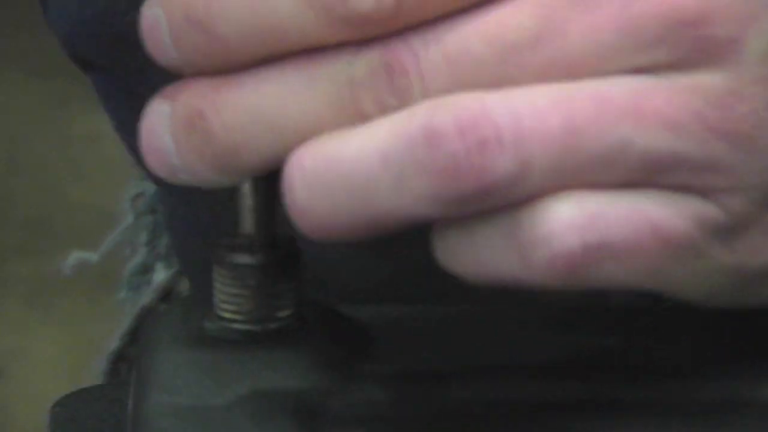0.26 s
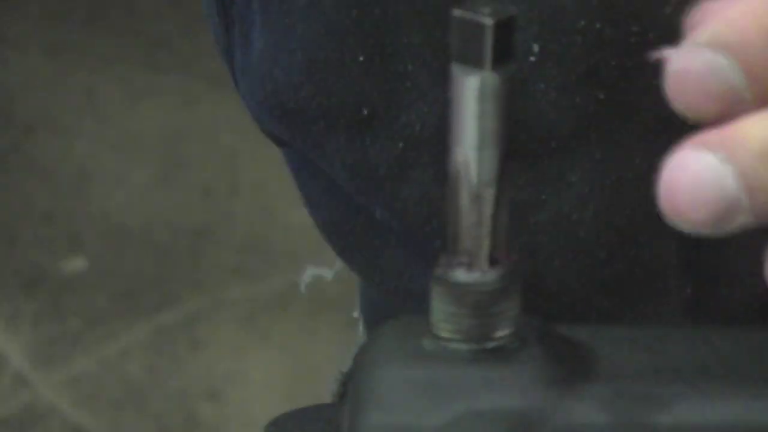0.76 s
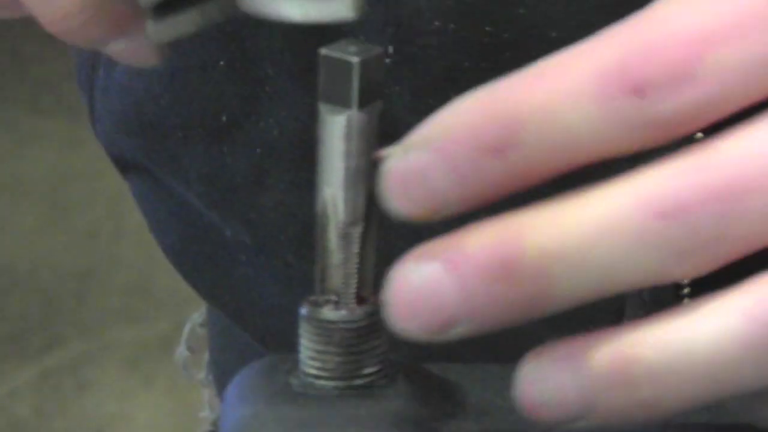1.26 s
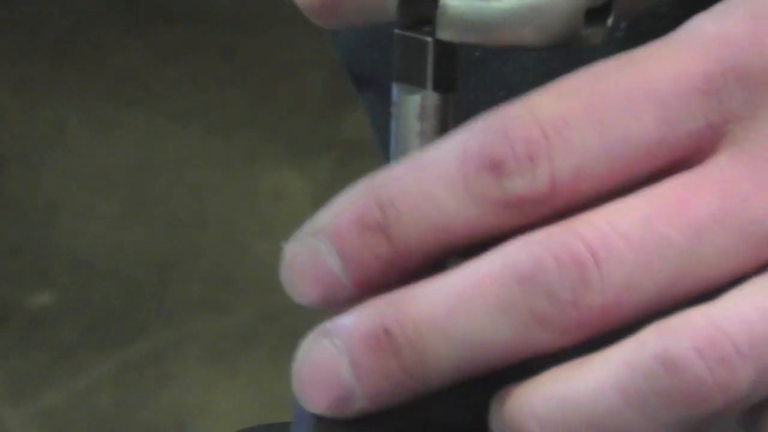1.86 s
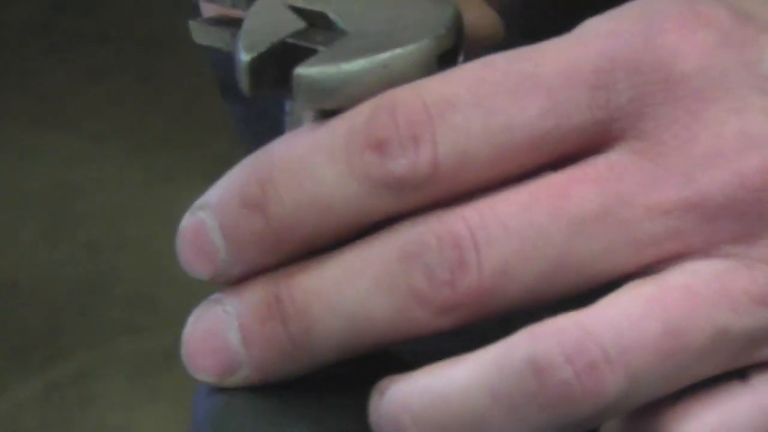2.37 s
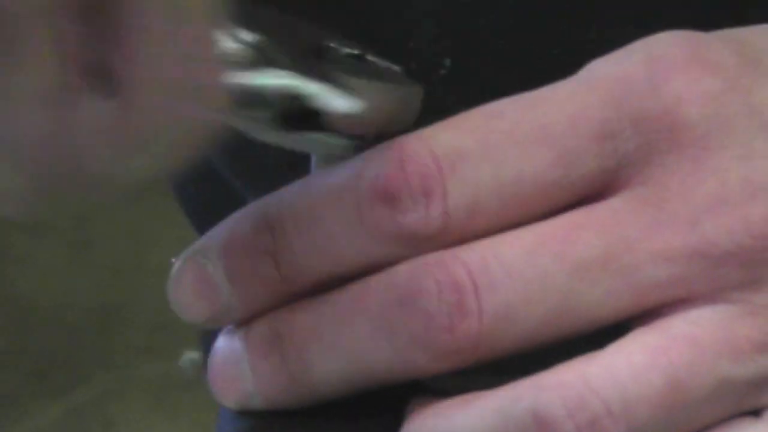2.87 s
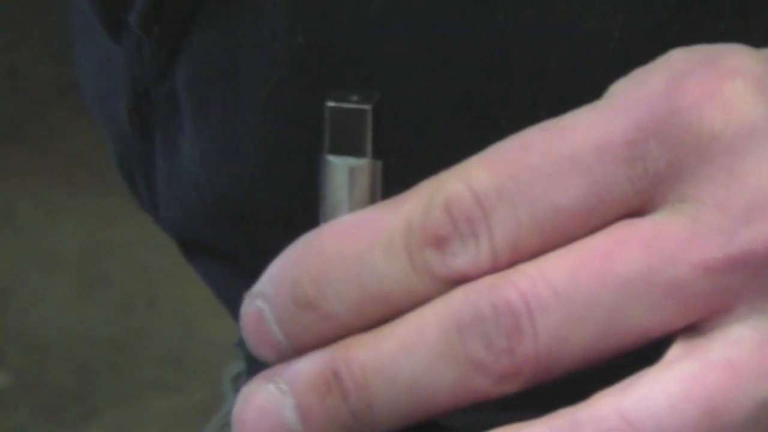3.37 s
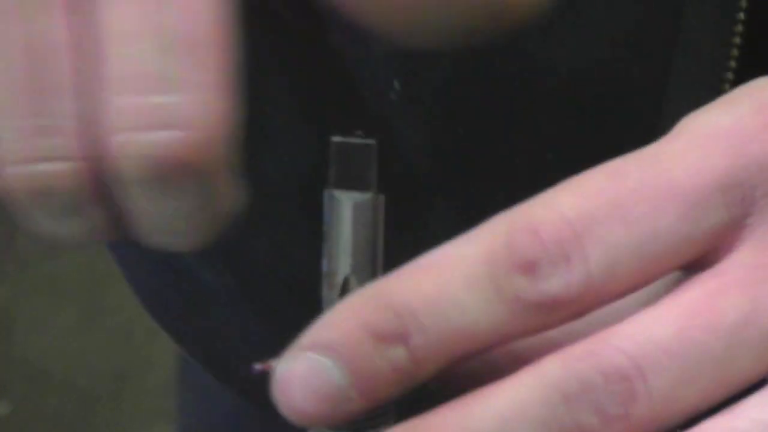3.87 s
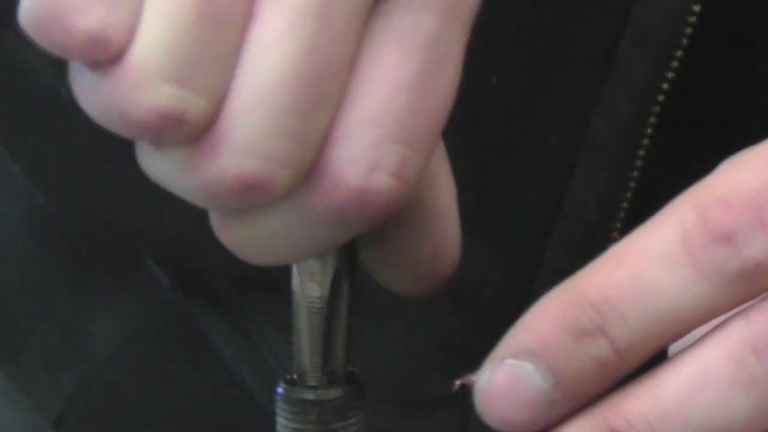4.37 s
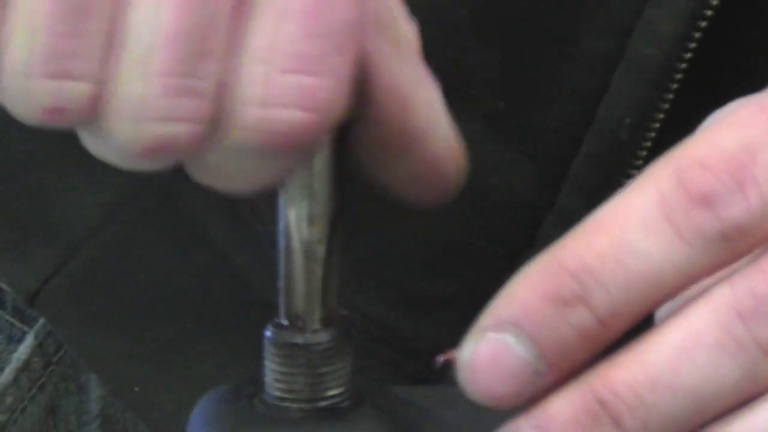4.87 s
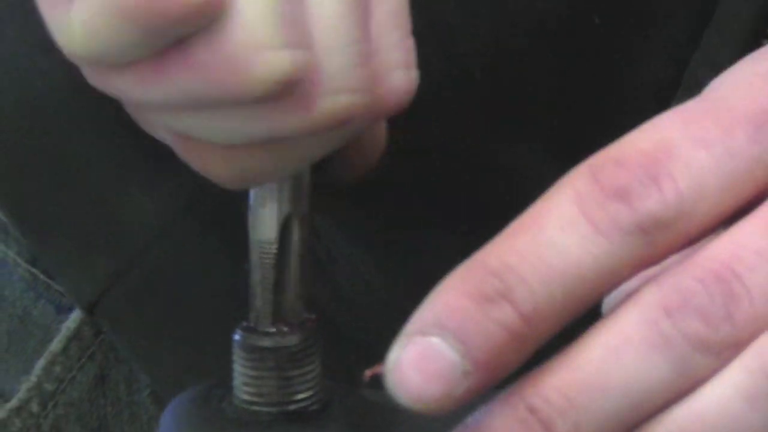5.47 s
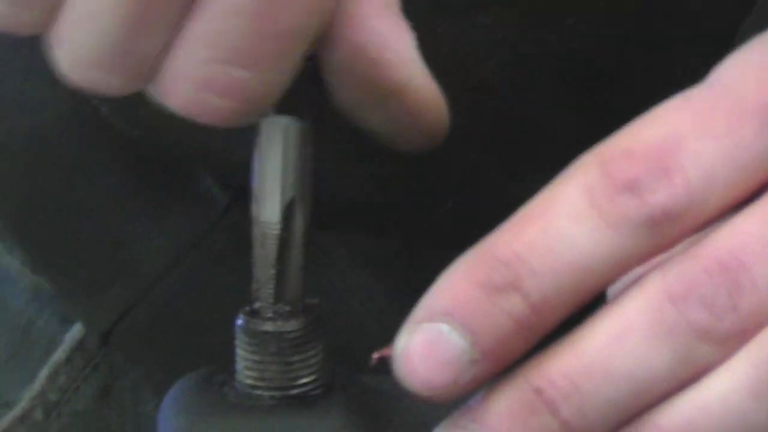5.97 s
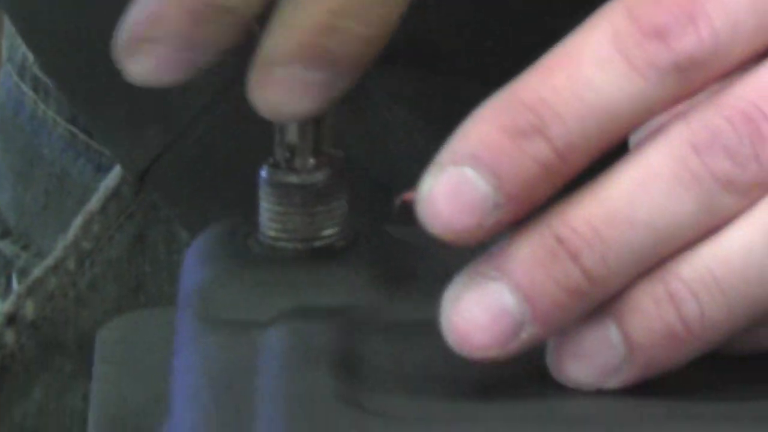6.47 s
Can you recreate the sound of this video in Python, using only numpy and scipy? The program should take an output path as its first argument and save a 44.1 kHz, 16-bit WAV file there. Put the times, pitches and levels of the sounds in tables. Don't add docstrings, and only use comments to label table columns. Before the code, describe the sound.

Steel wrench jaw knocks a tap in an empty sheet-metal tank, hollow thumps and bright clinks, then gritty thread scrapes, in a hard workshop.

```python
import sys
import numpy as np
from scipy import signal
from scipy.fft import rfft, irfft, next_fast_len
from scipy.io import wavfile
from scipy.ndimage import uniform_filter1d

SR = 44100
rng = np.random.default_rng(int(sys.argv[2]) if len(sys.argv) > 2 else 0)


def rack_gain(trim_db):
    fader = np.asarray(trim_db, float)
    return 10 ** (fader / 20)


def transcribe(signal):
    frames = np.atleast_2d(signal).T
    limited = np.clip(frames, -1, 1)
    pcm = np.round(limited * 32767).astype(np.int16)
    wavfile.write(sys.argv[1], SR, pcm)


N = 295911
ROOM_N, RING_N = SR * 3 // 5, SR * 2 // 5
FFT_N = 2 ** 15
FFT_HZ = np.fft.rfftfreq(FFT_N, 1 / SR)

# start in seconds, peak in dB, boom in dB, hardness in dB.
JAW_HITS = [(1.14, -62, -5, 12), (1.351, -18, -9.5, 1.5), (1.622, -9.5, -10, -10),
            (1.686, -17.5, -6.5, -2.5), (1.719, -17.5, -4.5, -18), (2.015, -16, -7.5, -5),
            (2.039, -13, -12, -13.5), (2.301, -28.5, -5.5, -11.5), (2.39, -12, -17.5, -8.5),
            (2.429, -14.5, -15, -48), (2.882, -27, -6, -15), (3.059, -25.5, -12, -13)]
# start in seconds, peak in dB, boom in dB, hardness in dB.
TAP_KNOCKS = [
    (4.277, -39.5, 9.5, -3),
    (4.309, -24.5, 1.5, -15),
    (4.446, -30, 0, -13),
    (5.457, -19, 0.5, -9.5),
    (5.474, -17, -1, -25.5),
    (5.634, -19, -8, -13),
    (5.965, -32, 4.5, -22.5),
    (6.254, -19.5, -13, -15.5),
    (6.369, -19, -10, -9),
    (6.411, -25.5, 0, -7.5),
]
# start in seconds, peak in dB, hardness in dB, contact length in seconds.
THREAD_BITES = [(2.372, -26, 4, .025), (2.541, -27.5, -13.5, 0.019), (3.312, -28, -12.5, 0.02),
                (4.327, -23.5, -23, 0.042), (4.364, -46, -29, 0.029), (5.569, -28.5, -6.5, 0.015),
                (5.614, -20, -13, 0.028), (6.043, -24, -10, 0.011), (6.066, -26, -6, 0.037),
                (6.127, -26, -11.5, 0.012), (6.209, -16.5, -10, 0.027), (6.347, -21, -8.5, 0.039),
                (6.431, -19, -29, 0.027), (6.652, -30, -24, 0.012)]
# start in seconds, peak in dB, boom in dB, hardness in dB.
TANK_BUMPS = [(0.523, -15, 0.5, -21.5), (0.53, -18.5, -4, -8.5), (0.54, -15, -3, -17),
              (2.272, -31.5, 0.5, -22), (2.391, -16.5, -5.5, -4), (2.688, -34, 6.5, -14),
              (2.76, -28, -7, -17.5), (3.562, -17.5, -3, -14), (3.654, -16, -1, -11),
              (3.669, -14.5, -1, -19), (3.697, -14.5, -1, -14.5)]
# start in seconds, peak in dB, hardness in dB.
FINGER_TAPS = [(0.291, -29.5, -18.5), (0.425, -34, -19.5), (4.287, -30, -18), (4.714, -42, -24),
               (4.736, -29, -21), (5.066, -29.5, -17), (5.209, -37, -37), (5.38, -27.5, -30),
               (5.421, -25.5, -23), (5.971, -35, -32)]
# middle in seconds, peak in dB, pitch in Hz, half
# length in seconds.
PANEL_SLAPS = [
    (0.5323, -9, 263, .0019),
    (.5382, -13.5, 268, .0019),
    (3.568, -12.5, 461, 0.0042),
    (3.6623, -7.5, 290, 0.0012),
    (3.668, -6.5, 290, 0.0011),
    (1.842, -25.5, 499, .017),
    (1.912, -27.5, 491, .016),
    (2.29, -28.5, 420, 0.023),
    (4.725, -36, 485, 0.0076),
]
# start in seconds, peak in dB, ring in dB, t60 in the grip in seconds,
# left minus right in dB.
WRENCH_CLINKS = [
    (1.1398, -16, -11.5, 0.13, 2.5),
    (3.0579, -8.5, -5.5, 0.047, 2.5),
    (3.149, -41, -13, .245, 2),
    (3.4925, -34.5, -7.5, 0.18, 6.5),
    (3.6561, -21, 5, 0.29, -2),
    (3.6681, -13.5, -3, 0.27, 6),
    (3.6965, -10, -4.5, 0.23, 3),
    (3.7294, -20.5, -15, .25, -3.5),
]
# peak time in seconds, peak in dB, swell in seconds, fade in seconds.
SCRAPE_STROKES = [
    (2.25, -32, 0.033, 0.18),
    (2.964, -34, 0.59, 0.062),
    (3.35, -47, 0.11, 0.19),
    (5.558, -36, .055, 0.088),
    (5.656, -33.5, 0.22, 0.032),
    (6.0, -51, 0.057, 0.19),
    (6.164, -30, 0.13, 0.059),
    (6.374, -33.5, 0.079, 0.23),
]
# peak time in seconds, peak in dB, swell in seconds, fade in seconds.
RUSTLE_STROKES = [
    (.538, -32.5, 0.049, 0.026),
    (.74, -40.5, 0.16, 0.046),
    (.782, -38, 0.038, 0.029),
    (2.46, -50, 0.23, 0.25),
    (2.98, -50, 2.2, .06),
    (3.058, -23, 0.03, .004),
    (5.11, -54, 0.034, 0.036),
    (6.222, -45, .11, 0.039),
    (6.336, -54, .06, .21),
]
# start in seconds, level in dB.
FLOOR_JOLTS = [
    (1.352, -47),
    (1.69, -45),
    (2.391, -31),
    (3.66, -41),
    (3.7, -42),
    (5.46, -55),
]

# low edge in Hz, high edge in Hz.
JAW_BANDS_HZ = [(130, 620), (900, 1850), (2400, 5000), (5000, 17000)]
KNOCK_BANDS_HZ = [(130, 700), (700, 1800), (1800, 5000), (5000, 17000)]
BUMP_BANDS_HZ = [(70, 250), (250, 700), (700, 1450), (1800, 7500)]
TAP_BANDS_HZ = [(70, 300), (300, 700), (700, 1400), (1850, 2600)]

# frequency in Hz, level in dB, t60 in seconds.
WALL_MODES = [(325, -9, .35), (414, -1, .7), (455, -5, .45), (490, -3, .7), (506, 0, .7), (585, -12, .2),
              (727, -4, .35), (851, -10, .2), (962, -9, .2), (1090, -8, .25), (1208, 0, .2), (1259, 2, .38),
              (1295, -6, .2), (1436, -9, .25), (1480, -5, .3), (1632, -1, .22), (2065, -10, .18),
              (2164, -10, .18), (2545, -10, .18), (2762, -10, .22), (2975, -10, .2), (3250, -8, .18),
              (4350, -11, .08), (4650, -13, .08), (5900, -12, .12)]
BELLY_MODES = [(83, -22, 0.69), (150.6, -10.5, 0.57), (171.5, -3, 0.16), (272.1, 2, 0.24),
               (288.6, 3.5, 0.14), (400, -10, 0.21)]
WRENCH_MODES = [(3640, -12, .06), (5600, -4, .1), (5650, -6, .32), (5916, -7, .1), (8043, -5, .27),
                (8100, -3, .06), (8850, -1.5, .08), (9033, -2, .06), (10230, -9, .05), (11650, -2, .04),
                (13000, -10, .04)]

# frequency in Hz, level in dB per Hz.
CRACK_SPECTRUM = [(35, -35), (60, -18), (156, -9), (338, -3.5), (503, -1.5), (1040, -8), (1250, -10.5),
                  (1660, -5.5), (1820, -16), (2050, -9.5), (2350, -15), (5210, -23), (9130, -27.5),
                  (16000, -44.5)]
RASP_SPECTRUM = [(71, -75), (120, -2.5), (205, 3.5), (373, -6), (513, 11), (567, -6.5), (706, 2.5),
                 (2070, -13), (14000, -48)]
CLOTH_SPECTRUM = [(1470, -9.5), (2500, -11), (2700, -10), (3130, -12.5), (10900, -19.5), (13700, -24),
                  (16000, -43.5)]
HUM_SPECTRUM = [(15, -28), (30, -14), (60, -6), (100, 4.5), (160, -5.5), (420, -1.5), (800, -9.5),
                (1600, -14.5), (2200, -19.5), (3200, -27), (5000, -28.5), (9000, -31), (14500, -31),
                (17000, -42)]

# frequency in Hz, t60 in seconds.
ROOM_T60 = [(80, 0.82), (250, 0.46), (1000, 0.63), (2500, 0.56), (5000, 0.41), (12000, 0.17)]
# frequency in Hz, likeness 0-1.
ROOM_ALIKE = [(100, 1), (1000, 0.61), (4000, 0.75), (10000, 0.11)]
HUM_ALIKE = [(60, 0.93), (180, 0.66), (550, 0.67), (1650, 0.51), (4970, 0.72), (15000, 0.23)]

# frequency in Hz, level in dB.
MIC_LOSS = [(40, -13), (68, -6), (86, 0.5), (11000, 2), (13500, -3), (16000, -20)]
# centre in Hz, width in Hz, depth 0-1.
SPECTRUM_DIPS = [(607, 83, 0.2), (1770, 172, 1), (2368, 170, 1), (3067, 140, 0.9), (5130, 2000, 0.37)]
# frequency in Hz, left minus right in dB.
PORT_LEAN = [(60, 1), (180, -1.5), (550, -1.5), (1650, -1.0), (4970, -1), (15000, 0.0)]


def jaws(rooms):
    contact_s = 0.012
    rows = [row + (contact_s,) for row in JAW_HITS]
    return blows(rows, JAW_BANDS_HZ, rooms, wall_db=0.5, belly_db=-13.0, wet_db=-2.0,
                 soft=0.028, rap=0.95, gains_db=[29.84, 21.95, 24.74, 20.2])


def knocks(rooms):
    contact_s = 0.012
    rows = [row + (contact_s,) for row in TAP_KNOCKS]
    return blows(rows, KNOCK_BANDS_HZ, rooms, wall_db=-2.5, belly_db=-17.5, wet_db=-3.5,
                 soft=0.073, rap=0.51, gains_db=[22.4, 22.2, 27.3, 20.9])


def bites(rooms):
    boom_db = -10
    rows = [(s, db, boom_db, hard_db, contact_s) for s, db, hard_db, contact_s in THREAD_BITES]
    return blows(rows, KNOCK_BANDS_HZ, rooms, wall_db=-8.0, belly_db=-53, wet_db=-3.0,
                 soft=0.33, rap=0.71, gains_db=[21.2, 20.4, 23.9, 16.4])


def bumps(rooms):
    contact_s = 0.0057
    rows = [row + (contact_s,) for row in TANK_BUMPS]
    return blows(rows, BUMP_BANDS_HZ, rooms, wall_db=-11, belly_db=-10.5, wet_db=-4.5,
                 soft=0.043, rap=0.78, gains_db=[24.6, 23.6, 29.1, 22.9])


def taps(rooms):
    boom_db, contact_s = -28, 0.0069
    rows = [(s, db, boom_db, hard_db, contact_s) for s, db, hard_db in FINGER_TAPS]
    return blows(rows, TAP_BANDS_HZ, rooms, wall_db=-9, belly_db=-17, wet_db=-4,
                 soft=0.12, rap=0.7, gains_db=[25.1, 22.6, 32.8, 20.7])


def blows(rows, bands_hz, rooms, wall_db, belly_db, wet_db, soft, rap, gains_db):
    mix, t = np.zeros((2, N)), np.arange(SR // 8) / SR
    ring_t = np.arange(RING_N) / SR
    wall, belly = ringing(WALL_MODES), ringing(BELLY_MODES)
    colour = causal(CRACK_SPECTRUM)
    colour_spec = rfft(colour / np.linalg.norm(colour), FFT_N)
    filters = [signal.butter(3, band, "bandpass", fs=SR, output="sos") for band in bands_hz]
    bands = np.array([signal.sosfreqz(sos, FFT_HZ, fs=SR)[1] for sos in filters])
    answers = 1 + rack_gain(wet_db) * rfft(np.array(rooms), FFT_N)
    for k, (s, db, boom_db, hard_db, contact_s) in enumerate(rows):
        onset = 1 - np.exp(-t / (soft * contact_s))
        chatter = rng.standard_normal(len(t)) * np.exp(-t / contact_s) * onset
        crack = rfft(chatter / np.linalg.norm(chatter), FFT_N) * colour_spec
        body = rack_gain(wall_db) * ring(wall, spread_db=1.0) + rack_gain(belly_db) * ring(belly, spread_db=2.5)
        body *= 1 - np.exp(-ring_t / (0.27 * contact_s))
        heard = (crack + rfft(body, FFT_N)) * answers[k % len(rooms)]
        energy = np.abs(bands) ** 2 @ np.abs(heard[0]) ** 2 * 2 / FFT_N
        band_db = db + np.array([boom_db, 0, rap * hard_db, hard_db]) + gains_db
        shares = rack_gain(band_db) / np.sqrt(energy)
        add(mix, irfft(heard * (shares @ bands), FFT_N), s)
    return mix


def slaps():
    t, out = np.arange(N) / SR, np.zeros(N)
    for s, db, hz, half_s in PANEL_SLAPS:
        out += rack_gain(db) * np.cos(2 * np.pi * hz * (t - s)) * np.exp(-((t - s) / half_s) ** 2)
    return out


def clinks(rooms):
    tick_t60_s, rise_s = 0.013, 0.001
    mix, t, sines = np.zeros((2, N)), np.arange(RING_N) / SR, ringing(WRENCH_MODES)
    rise = 1 - np.exp(-t / rise_s)
    bright = signal.butter(4, 6000, "highpass", fs=SR, output="sos")
    for k, (s, db, ring_db, grip_t60_s, pan_db) in enumerate(WRENCH_CLINKS):
        tick = signal.sosfilt(bright, rng.standard_normal(len(t))) * rack_gain(-60 * t / tick_t60_s)
        steel = ring(sines, spread_db=4.5) * rack_gain(-60 * t / grip_t60_s)
        steel = rack_gain(ring_db) * steel / np.linalg.norm(steel)
        struck = rise * (steel + tick / np.linalg.norm(tick))
        heard = in_room(struck, rooms[k], wet_db=-6.5) * rack_gain([[pan_db / 2], [-pan_db / 2]])
        heard[0] = 0.68 * heard[0] + 0.27 * np.roll(heard[0], 1)
        onset_rms = np.std(heard[:, :SR // 200])
        add(mix, heard * rack_gain(db - 8.5) / onset_rms, s)
    return mix


def scrapes(room):
    colour = causal(RASP_SPECTRUM)
    body = rack_gain(-16) * ring(ringing(WALL_MODES), spread_db=13.0)
    body[:len(colour)] += colour / np.linalg.norm(colour)
    slips = strokes(SCRAPE_STROKES) * grains(spike_db=2.5, per_s=270)
    return rack_gain(-9.0) * in_room(signal.fftconvolve(slips, body), room, wet_db=2.5)[:, :N]


def rustles(room):
    slide = grains(spike_db=1.3, per_s=300)
    hiss = unit(filtered(slide, lambda hz: rack_gain(along(CLOTH_SPECTRUM, hz))))
    return rack_gain(-6.0) * in_room(strokes(RUSTLE_STROKES) * hiss, room, wet_db=-5)[:, :N]


def jolts():
    fade_s, corner_hz = 0.026, 59
    t = np.arange(N) / SR
    shake = sum(rack_gain(db) * np.exp(-np.abs(t - s) / fade_s) * (t > s) for s, db in FLOOR_JOLTS)
    deep = filtered(rng.standard_normal((2, N)), lambda hz: 1 / (1 + (hz / corner_hz) ** 4))
    return shake * unit(deep)


def hum():
    level_db, patch_db = -49, 2
    z = signal.stft(rng.standard_normal((2, N)), nperseg=512)[2]
    patches = uniform_filter1d(rng.standard_normal(z.shape[1:]), 5, 0)
    patches = unit(uniform_filter1d(patches, 12, 1))
    pair = signal.istft(z * rack_gain(patch_db * patches), nperseg=512)[1][:, :N]
    pair = filtered(pair, lambda hz: rack_gain(along(HUM_SPECTRUM, hz)))
    return rack_gain(level_db) * unit(paired(pair, HUM_ALIKE))


def tails(count):
    hz, t, z = signal.stft(rng.standard_normal((2 * count, ROOM_N)), SR, nperseg=256)
    decay = rack_gain(-60 * t / along(ROOM_T60, hz)[:, None])
    noise = signal.istft(z * decay, SR, nperseg=256)[1][:, :ROOM_N]
    noise *= 1 - np.exp(-np.arange(ROOM_N) / SR / 0.0012)
    pairs = noise.reshape(count, 2, ROOM_N)
    return [paired(pair, ROOM_ALIKE) / np.linalg.norm(pair[0]) for pair in pairs]


def in_room(x, tail, wet_db):
    direct = np.pad(x, (0, ROOM_N - 1))
    return direct + rack_gain(wet_db) * signal.fftconvolve(x[None], tail, axes=1)


def ringing(modes):
    hz, db, t60_s = np.transpose(modes)[:, :, None]
    t = np.arange(RING_N) / SR
    beating = np.sin(2 * np.pi * hz * t) + 0.79 * np.sin(2 * np.pi * hz * 1.007 * t)
    return rack_gain(db - 60 * t / t60_s) * beating


def ring(sines, spread_db):
    strength, sign = rng.standard_normal((2, len(sines)))
    x = (rack_gain(spread_db * strength) * np.sign(sign)) @ sines
    return x / np.linalg.norm(x)


def grains(spike_db, per_s):
    size = rack_gain(spike_db * rng.exponential(size=int(N * per_s / SR) + 2))
    strength = np.interp(np.arange(N) * per_s / SR, np.arange(len(size)), size)
    return unit(rng.standard_normal(N) * strength)


def strokes(rows):
    t, gain = np.arange(N) / SR, np.zeros(N)
    for s, db, swell_s, fade_s in rows:
        gain += rack_gain(db - 20 * np.maximum((s - t) / swell_s, (t - s) / fade_s))
    return gain


def unit(x):
    return x / np.sqrt(np.mean(x ** 2) + 1e-20)


def along(points, hz):
    f, v = np.transpose(points)
    return np.interp(np.log(hz + 1), np.log(f + 1), v)


def filtered(x, response):
    m = next_fast_len(x.shape[-1] + 4096)
    return irfft(rfft(x, m) * response(np.fft.rfftfreq(m, 1 / SR)), m)[..., :x.shape[-1]]


def causal(points):
    level_db = np.maximum(along(points, np.fft.rfftfreq(4096, 1 / SR)), -70)
    cep = irfft(np.log(rack_gain(level_db)))
    cep[1:2048] *= 2
    cep[2049:] = 0
    return irfft(np.exp(rfft(cep)))[:2048]


def paired(pair, alike):
    def mid_side(hz):
        turn = np.arccos(np.clip(along(alike, hz), -1, 1)) / 2
        return np.array([np.cos(turn), np.sin(turn)])
    mid, side = filtered(pair, mid_side)
    return np.array([mid + side, mid - side])


def add(mix, x, s):
    part = mix[:, round(s * SR):][:, :x.shape[1]]
    part += x[:, :part.shape[1]]


def scene():
    rooms = tails(count=10)
    near = jaws(rooms) + knocks(rooms) + bites(rooms) + bumps(rooms) + taps(rooms)
    near = near + slaps() + clinks(rooms) + scrapes(rooms[8]) + rustles(rooms[9])
    return filtered(near, lambda hz: rack_gain(along(MIC_LOSS, hz))) + jolts() + hum()


def roll_off(x):
    return signal.sosfilt(signal.butter(12, 16630, fs=SR, output="sos"), x)


def record(dry):
    def response(hz):
        dips = np.ones(len(hz), complex)
        for centre, width, depth in SPECTRUM_DIPS:
            damping = 1j * hz * width
            dips *= 1 - min(depth, 0.95) * damping / (centre ** 2 - hz ** 2 + damping)
        lean = rack_gain(along(PORT_LEAN, hz) * np.array([[0.5], [-0.5]]))
        return dips * lean * (hz < 16500)
    return roll_off(filtered(dry, response))


dry = scene()
out = record(dry)
transcribe(out)
```